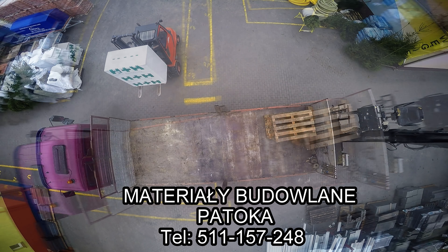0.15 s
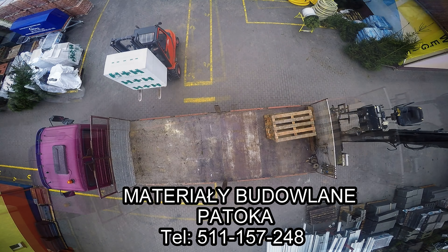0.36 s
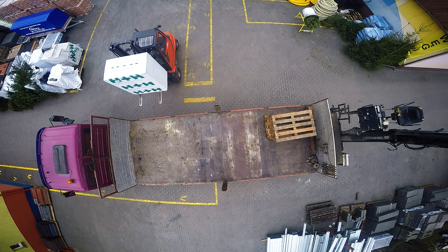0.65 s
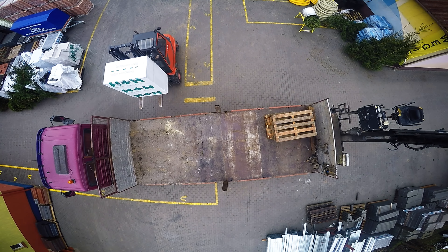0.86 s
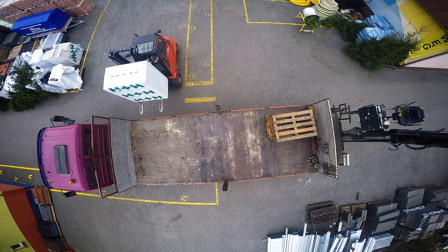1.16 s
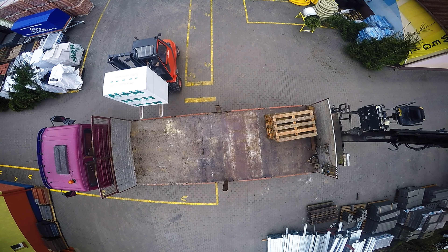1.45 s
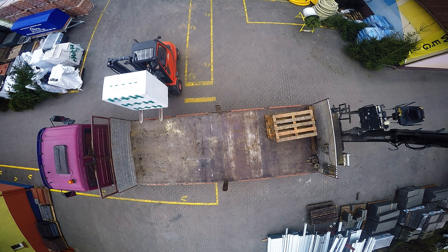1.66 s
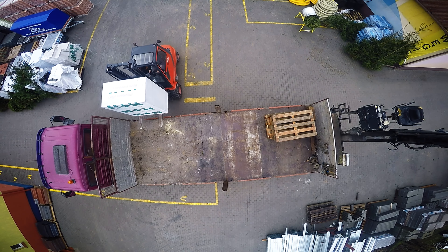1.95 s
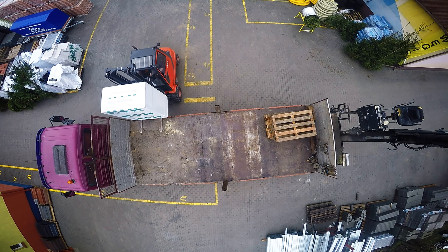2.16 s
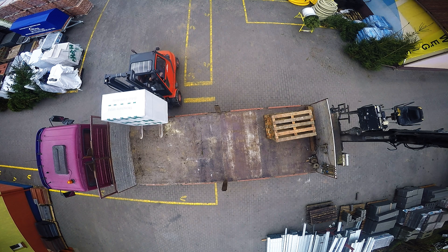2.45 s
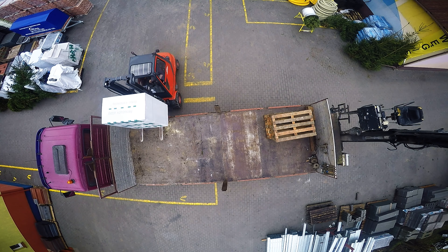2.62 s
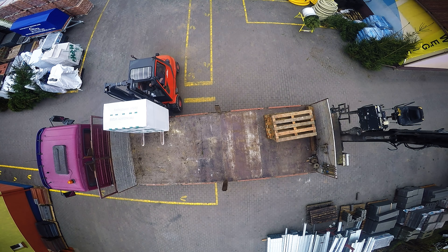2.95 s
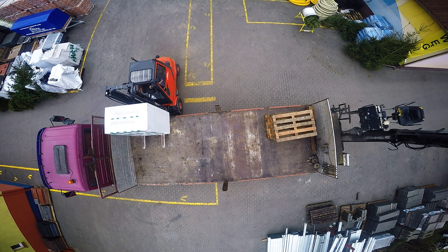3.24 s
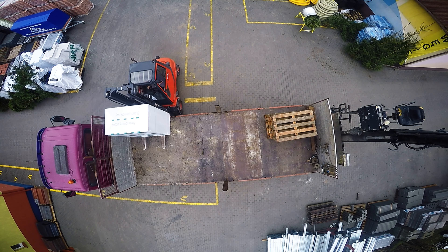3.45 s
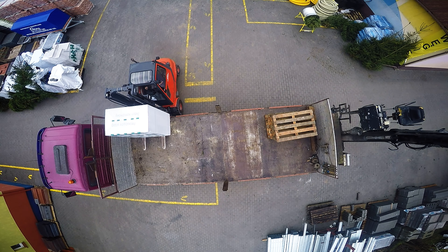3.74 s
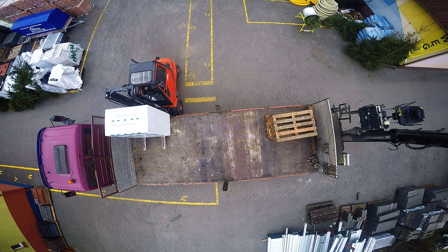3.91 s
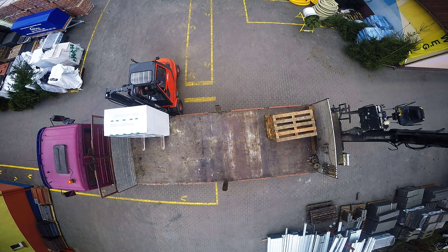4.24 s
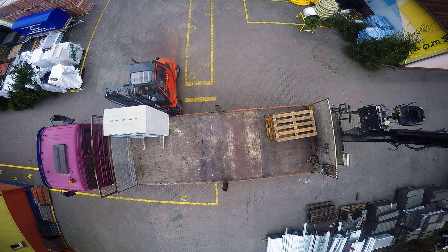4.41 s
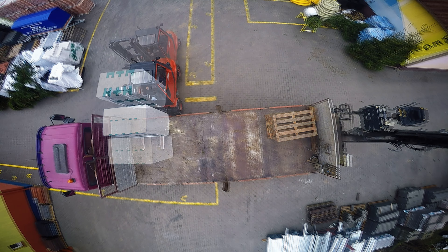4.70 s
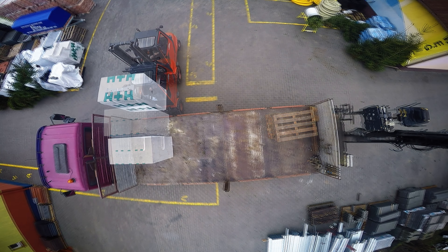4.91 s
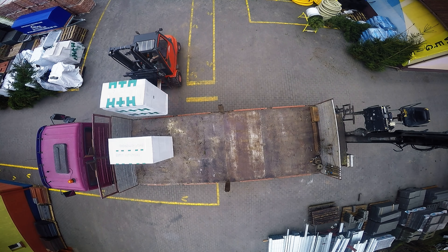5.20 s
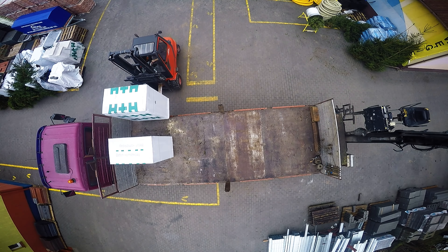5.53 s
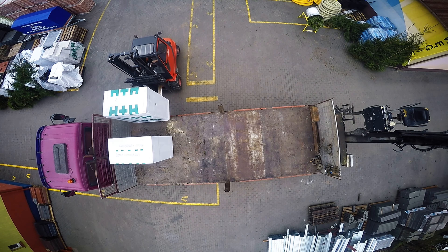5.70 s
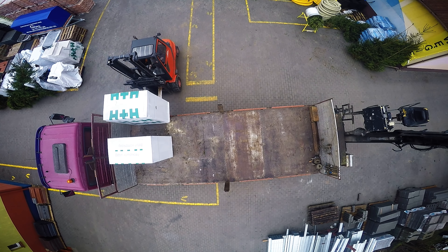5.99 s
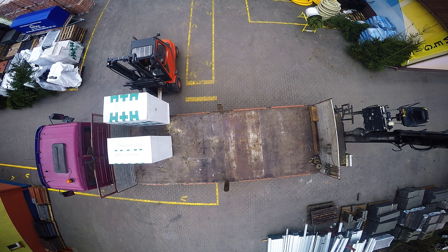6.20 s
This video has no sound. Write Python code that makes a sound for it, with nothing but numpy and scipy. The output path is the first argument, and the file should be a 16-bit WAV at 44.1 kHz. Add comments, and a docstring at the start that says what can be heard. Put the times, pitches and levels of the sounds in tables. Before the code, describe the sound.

A diesel forklift clatters and knocks steadily in an open yard, sags as its load clunks and groans onto a lorry bed, then revs up again.

```python
"""Lorry yard, heard from a camera high above: a three-cylinder diesel forklift sets a pallet of blocks on a lorry bed.
The exhaust is summed sines on the firing rate; firing jolts ring noise-fed block and hydraulic pipe resonances.
Some firings knock hard and loose panels rattle once per engine cycle.
The load drags and clunks down, small metal parts tick as short noise bursts.
The camera mount shudders at a low note, mostly early on, and rumbles in gusts, over yard air, hiss and a thin whine."""
import sys
import numpy as np
from scipy import signal
from scipy.fft import rfft, irfft
from scipy.io import wavfile
from scipy.ndimage import uniform_filter1d

SR = 44100
rng = np.random.default_rng(int(sys.argv[2]) if len(sys.argv) > 2 else 0)


def dump(signal):
    """Clip the signal to [-1, 1] and save it as 16-bit WAV at the path in sys.argv[1]."""
    limited = np.clip(np.atleast_2d(signal).T, -1, 1)
    pcm = np.round(limited * 32767).astype(np.int16)
    wavfile.write(sys.argv[1], SR, pcm)


N = 280476
TIME = np.arange(N) / SR

# engine speed: [t/s, firing rate/Hz]
SPEED_CURVE = [(0.0, 35.7), (0.44, 37.2), (0.73, 33.3), (1.08, 35.5), (2.01, 35.2), (2.42, 36.65),
               (3.14, 36.2), (3.56, 34.7), (3.96, 33.8), (4.23, 31.7), (4.59, 31.8), (4.8, 35.4),
               (5.3, 36.4), (5.82, 36.3), (6.36, 35.3)]
# engine effort, before the clatter and pump trims: [t/s, level/dB]
EFFORT_CURVE = [(0, -47), (0.25, -48.5), (0.48, -46), (0.67, -50.5), (0.77, -44), (1.0, -46.5), (2.2, -46),
                (2.7, -45), (3.5, -47), (3.9, -48), (4.3, -46.5), (4.65, -50.5), (5.15, -47), (5.6, -47.5),
                (5.95, -46)]
# hydraulic load, re effort and before the pump trim: [t/s, level/dB]
PRESSURE_CURVE = [(0, -9.5), (2.2, -8.5), (3.1, -5.5), (4.3, -5), (4.7, -4.5), (5.05, -15)]
# engine block resonances: [f/Hz, width/Hz, relative level/dB]
BLOCK_MODES = [(398, 260, -19.5), (614, 137, -13), (1209, 100, -16.5), (1478, 190, -9.5), (1779, 217, -3),
               (1994, 326, -6), (2425, 165, 3.5), (2598, 345, -3.5), (3072, 414, -5), (3830, 350, -12),
               (4940, 790, -23), (6420, 690, -30.5)]
# hydraulic pump and pipe resonances: [f/Hz, width/Hz, relative level/dB]
PIPE_MODES = [(1071.4, 87, 5), (1200, 93, 2.5)]


def forklift(clatter_trim_db=-1.5, pump_trim_db=-3.5, pump_throb=0.72):
    """Exhaust, block clatter, knocks, pump and panels all follow the crank."""
    rate_hz, = in_time(SPEED_CURVE)
    firings = np.cumsum(rate_hz) / SR   # running count
    effort_db, = in_time(EFFORT_CURVE)
    pressure_db, = in_time(PRESSURE_CURVE)
    force = firing_force(firings)

    clatter = rattle(force, BLOCK_MODES, lambda: valve_train(firings))
    clatter = from_db(effort_db + clatter_trim_db) * clatter
    pump_force = rms_one(1 + pump_throb * (force - 1))
    pump = from_db(effort_db + pressure_db + pump_trim_db) * rattle(pump_force, PIPE_MODES)
    return exhaust(firings, rate_hz) + clatter + knocks(firings) + pump + panels(firings)


# boom, re the boom level: [multiple of firing rate, level/dB]
BOOM_ORDERS = [(1, -7), (2, 2.5), (3, -12.5)]
# burr, re the burr curve: [multiple of firing rate, level/dB]
BURR_ORDERS = [(4, 1.5), (5, -17), (6, -22.5)]
# burr strength: [t/s, level/dB]
BURR_CURVE = [(0.2, -66), (0.85, -54.5), (1.15, -57.5), (2.4, -61), (4.1, -60), (4.45, -66), (5.1, -56.5),
              (5.7, -58), (6.05, -55)]
# the boom weakens as the engine is dragged below working speed
WORKING_HZ, BOOM_DB, BOOM_DB_PER_HZ = 36, -51.5, 2.5


def exhaust(firings, rate_hz):
    """One puff per firing: phase-locked low multiples of the firing rate."""
    excess_hz = np.minimum(rate_hz - WORKING_HZ, 0.4)
    boom_db = BOOM_DB + BOOM_DB_PER_HZ * excess_hz
    burr_db, = in_time(BURR_CURVE)
    out = 0
    for group_db, orders in ((boom_db, BOOM_ORDERS), (burr_db, BURR_ORDERS)):
        for order, db in orders:
            tone = np.sqrt(2) * np.sin(2 * np.pi * order * firings)
            out = out + from_db(group_db + db) * tone
    return out


def firing_force(firings, fall_firings=0.53, steady=1.0, uneven_db=2.0, ignition_firings=0.22):
    """Each firing is a jolt of uneven size, decaying over steady gear noise."""
    turn = firings + 3 - ignition_firings   # +3 keeps the count positive
    number = turn.astype(int)
    sizes = from_db(uneven_db * rng.standard_normal(number[-1] + 1))
    jolts = sizes[number] * np.exp(-(turn % 1) / fall_firings)
    return rms_one(steady + jolts)


def valve_train(firings, repeat=0.67):
    """Fine contact noise, part of which repeats every engine cycle (3 firings)."""
    cycle = (firings // 3).astype(int)
    samples_since_start = np.arange(N) - np.searchsorted(cycle, cycle)
    repeated = rng.standard_normal(N)[samples_since_start]
    return rms_one(repeat * repeated + rng.standard_normal(N))


# knocking spells: [start t/s, end t/s, cylinder 0-2, kick level/dB before scatter]
KNOCK_SPELLS = [(0.33, 0.49, 1, -33.5), (0.76, 1.08, 1, -33), (1.1, 2.28, 1, -37.5), (2.45, 3.7, 1, -36),
                (5.55, 6.3, 1, -36), (1.46, 2.55, 2, -44), (2.56, 3.2, 2, -37), (3.22, 3.99, 2, -32),
                (4.08, 4.36, 2, -33), (4.46, 4.73, 2, -36.5), (5.08, 5.72, 2, -40), (5.74, 6.3, 2, -37.5)]
KNOCK_PLACE_FIRINGS = 0.29   # delay after the firing count ticks over
KNOCK_SCATTER_DB, SLAP_DB, SLAP_SCATTER_DB = 1.6, -3, 0.5


def hard_firings(firings):
    """A knocking cylinder strikes at one crank angle each cycle: rows (t/s, kick/dB, slap re kick/dB)."""
    number = np.arange(int(firings[-1]))
    times_s = np.interp(number + KNOCK_PLACE_FIRINGS, firings, TIME)
    luck = rng.standard_normal((len(number), 2))
    rows = []
    for start_s, end_s, cylinder, db in KNOCK_SPELLS:
        for n in number[round(cylinder)::3]:
            if start_s <= times_s[n] < end_s:
                kick_db = db + KNOCK_SCATTER_DB * luck[n, 0]
                slap_db = SLAP_DB + SLAP_SCATTER_DB * luck[n, 1]
                rows.append((times_s[n], kick_db, slap_db))
    return rows


# covers rattled by a knock: [f/Hz, width/Hz, relative level/dB]
COVER_MODES = [(1227, 100, 5), (1930, 710, -2.5), (2467, 280, 8.5), (2980, 840, -21), (3850, 400, -4)]


def knocks(firings, ring_hz=2440, rattle_db=-13.0, decay_s=0.011, slap_s=0.0074):
    """A hard firing rings the block's main mode, slaps it once more and rattles the covers."""
    kicks, hard = np.zeros(N), hard_firings(firings)
    for s, db, slap_db in hard:
        kicks[int(s * SR)] = from_db(db)
        kicks[int((s + slap_s) * SR)] += from_db(db + min(slap_db, 0))
    ring = band(kicks, ring_hz - 65, ring_hz + 65)
    ring *= 0.55 * kicks.max() / np.abs(ring).max()
    shaking = signal.lfilter(np.ones(130) / 130, [1], blows(hard, decay_s))   # onset softened over 3 ms
    return ring + from_db(rattle_db) * rattle(shaking, COVER_MODES)


# loose parts: [start t/s, end t/s, place/firings, length/firings, f/Hz, width/Hz, full-swell rms level/dB]
LOOSE_PANELS = [(0.067, 3.8, 0.26, 0.39, 472, 40, -70.5), (5, 7.7, 0.18, 0.43, 446, 42, -69),
                (3.13, 4.43, 2.48, 0.25, 1216, 110, -63), (4.92, 6.25, 2.5, 1, 610, 78, -65)]
# mast resonances: [f/Hz, width/Hz, full-swell rms level/dB]
MAST_MODES = [(1260, 100, -68), (1572, 41, -63.5), (1810, 250, -67), (1920, 56, -58)]
MAST_FROM_S, MAST_PLACE_FIRINGS, MAST_LENGTH_FIRINGS = 5.07, 2.35, 0.23


def panels(firings, fade_s=0.39, loose=0.31):
    """Loose panels and mast rattle in one burst per engine cycle, much the same each time."""
    mast = [(MAST_FROM_S, np.inf, MAST_PLACE_FIRINGS, MAST_LENGTH_FIRINGS, *mode) for mode in MAST_MODES]
    out = 0
    for start_s, end_s, place, length, hz, width_hz, db in list(LOOSE_PANELS) + mast:
        swell = np.clip(np.minimum(TIME - start_s, end_s - TIME) / fade_s, 0, 1)
        offset = (firings - place + 1.5) % 3 - 1.5   # firings from burst centre
        burst = rms_one(np.exp(-(offset / length) ** 2))
        mode = [(hz, width_hz, 0)]
        same = rms_one(rattle(burst, mode, lambda: valve_train(firings, repeat=17)))
        varied = loose * rattle(burst, mode)
        out = out + from_db(db) * swell * rms_one(same + varied)
    return out


# load settling on the bed: [t/s, force level/dB]
LOAD_CLUNKS = [(4.08, -58), (4.152, -49), (4.247, -58), (4.29, -59), (4.655, -56)]
# pallet and bed resonances: [f/Hz, width/Hz, relative level/dB]
BED_MODES = [(367, 62, -0.5), (580, 150, 1.5), (810, 150, -1), (1500, 900, -28)]
# pallet drags as it settles and as the forks let go: [t/s, peak force level/dB, half-width/s]
PALLET_DRAGS = [(4.15, -60, 0.26), (4.72, -59, 0.2)]
# deep bed notes brought out by a drag: [f/Hz, width/Hz, relative level/dB]
GROAN_MODES = [(104, 22, 1), (195, 49, -12), (376, 77, -10.5)]


def load(decay_s=0.033):
    """Decaying blows clunk the pallet on the bed; smooth drags make the bed groan."""
    clunk = rattle(blows(LOAD_CLUNKS, decay_s), BED_MODES)
    groan = rattle(swells(PALLET_DRAGS), GROAN_MODES)
    return clunk + groan


# sharp metal ticks, before the tick trim: [t/s, peak level/dB, lowest f/Hz, highest f/Hz]
SHARP_TICKS = [(0.101, -53, 6500, 11500), (4.167, -53, 5200, 8000), (4.349, -48.5, 3780, 7400),
               (4.466, -57, 4000, 9000), (5.104, -48, 7000, 13900), (5.858, -51, 4500, 9000),
               (6.289, -49, 7000, 14000), (6.307, -44, 5960, 12600)]
# faint ticks at random times, same trim
FAINT_FROM_S, FAINT_TO_S = 4.6, 6.3
FAINT_TICK_DB, FAINT_LOW_HZ, FAINT_HIGH_HZ = -56, 6200, 11400


def ticks(decay_s=0.001, trim_db=2.5, faint_count=4):
    """Metal on metal: very short, bright, band-limited noise snaps."""
    out, age_s = np.zeros(N), TIME[:SR // 40]
    faint_times_s = rng.uniform(FAINT_FROM_S, FAINT_TO_S, faint_count)
    faint = [(s, FAINT_TICK_DB, FAINT_LOW_HZ, FAINT_HIGH_HZ) for s in faint_times_s]
    for s, db, low_hz, high_hz in list(SHARP_TICKS) + faint:
        noise = rng.standard_normal(len(age_s)) * np.exp(-age_s / decay_s)
        snap = band(noise, low_hz, high_hz)
        snap = from_db(db + trim_db) * snap / np.abs(snap).max()
        at = int(s * SR)
        out[at:at + len(age_s)] += snap[:N - at]
    return out


# gusts on the camera mount, before the rumble trim: [t/s, peak of rms level/dB, half-width/s]
MOUNT_GUSTS = [(0.06, -42, 0.15), (0.49, -47.5, 0.031), (2.27, -51.5, 0.05), (4.3, -48.5, .09),
               (4.72, -47.5, 0.21), (5.22, -50, 0.21), (5.85, -43.5, 0.12), (6.15, -41.5, 0.12),
               (6.34, -46.5, 0.097)]
BREEZE_DB = -58.5   # rumble between gusts, same trim
# shudders of the mount: jolts, and one swell driven by the engine at 2.35 s:
# [t/s, peak of rms level/dB, decay/s]
MOUNT_SHUDDERS = [(0.025, -36.5, 0.14), (0.14, -45.5, .08), (0.236, -31, 0.054), (0.485, -39.5, 0.011),
                  (2.35, -54, .35)]
SHUDDER_RISE_S = 0.019
# rumble colour: [f/Hz, relative density/dB]
RUMBLE_SPECTRUM = [(15, -11), (28, -15), (36, 3), (41, 1), (47, -8), (56, -12), (75, -15.5), (110, -16),
                   (150, -35), (200, -40.5), (400, -43), (1000, -78)]
# mount creak resonances: [f/Hz, width/Hz, relative level/dB]
CREAK_MODES = [(4820, 190, 4), (7000, 390, -10), (10300, 1400, -14)]


def mount(rumble_trim_db=3.5, shudder_hz=109, wander_hz=3.0,
          creak_gain_db=-37.0, creak_scatter_db=3.8, creak_limit_db=-35.0):
    """Gusts sway the camera mount; when shaken it shudders at its own low note and creaks."""
    sway = np.hypot(from_db(BREEZE_DB), swells(MOUNT_GUSTS))
    rumble = coloured(RUMBLE_SPECTRUM)
    rumble /= np.sqrt(uniform_filter1d(rumble ** 2, size=SR // 10))   # sway alone sets its strength

    shake = 0
    for s, db, decay_s in MOUNT_SHUDDERS:
        fall = np.maximum((s - TIME) / SHUDDER_RISE_S, (TIME - s) / decay_s)
        shake = shake + from_db(db) * np.exp(-fall)
    note_hz = shudder_hz + wander_hz * drift(8.5)
    note = np.sqrt(2) * np.sin(2 * np.pi * np.cumsum(note_hz) / SR)

    creak_gain = from_db(creak_gain_db + creak_scatter_db * drift(30))
    creak = rattle(np.minimum(shake, from_db(creak_limit_db)) * creak_gain, CREAK_MODES)
    return from_db(rumble_trim_db) * sway * rumble + shake * note + creak


# yard air and hiss colour: [f/Hz, relative density/dB]
AIR_SPECTRUM = [(30, -12), (150, 10), (250, -2.5), (400, -2), (600, -6), (800, -1.5), (1400, -3.5),
                (3000, -3.5), (4500, -14.5), (5800, -21.5), (7500, -18), (8500, -20.5), (11000, -22.5),
                (15000, -25.5)]
# yard air and hiss strength: [t/s, rms level/dB]
AIR_CURVE = [(0, -57), (1, -56.5), (4.2, -57.5), (4.65, -59), (4.95, -58.5), (5.3, -57), (6.36, -55)]


def yard_air():
    """Coloured noise whose level drifts slowly."""
    air_db, = in_time(AIR_CURVE)
    return from_db(air_db) * coloured(AIR_SPECTRUM)


# camera electronics whine: [f/Hz, rms level/dB]
WHINE_TONES = [(5033, -80.5), (10045, -83), (10072, -94), (15079, -92)]


def whine(wander_hz=1.9):
    """Thin tones of steady level from the camera's electronics, wandering slightly in pitch."""
    out = 0
    for hz, db in WHINE_TONES:
        tone_hz = hz + wander_hz * drift(2.46)
        out = out + from_db(db) * np.sqrt(2) * np.sin(2 * np.pi * np.cumsum(tone_hz) / SR)
    return out


def from_db(db):
    """Decibels to gain."""
    return 10 ** (np.asarray(db) / 20)


def rms_one(x):
    """Scale to unit rms."""
    return x / np.sqrt(np.mean(x ** 2) + 1e-20)


def in_time(rows):
    """Each column of a curve, interpolated at every sample."""
    s, *columns = np.transpose(rows)
    return [np.interp(TIME, s, column) for column in columns]


def coloured(points):
    """Steady noise with the given spectrum, straight lines in dB over log f; rms 1."""
    hz, db = np.transpose(points)
    bins_hz = np.maximum(np.arange(N // 2 + 1) * SR / N, 1)
    gain = from_db(np.interp(np.log(bins_hz), np.log(hz), db))
    return rms_one(irfft(rfft(rng.standard_normal(N)) * gain, N))


def drift(rate_hz):
    """Slow random signal, mostly below rate_hz; rms 1."""
    bins_hz = np.arange(N // 2 + 1) * SR / N
    return rms_one(irfft(rfft(rng.standard_normal(N)) / (1 + (bins_hz / rate_hz) ** 4), N))


def band(x, low_hz, high_hz):
    """Causal band-pass."""
    edges_hz = [max(low_hz, 10), min(high_hz, SR / 2 - 100)]
    return signal.sosfilt(signal.butter(2, edges_hz, "band", fs=SR, output="sos"), x + 1e-18)


def rattle(force, resonances, grain=None):
    """A rough force shakes each resonance with its own noise; steady force 1 gives about rms 1."""
    grain = grain or (lambda: rng.standard_normal(N))
    out, power = 0, 0
    for hz, width_hz, db in resonances:
        out = out + from_db(db) * band(force * grain(), hz - width_hz / 2, hz + width_hz / 2)
        power += from_db(db) ** 2 * width_hz * 2 / SR
    return out / np.sqrt(power)


def blows(rows, decay_s):
    """A force that jumps at each (t/s, level/dB) row and decays exponentially."""
    hits = np.zeros(N)
    for s, db, *rest in rows:
        hits[int(s * SR)] += from_db(db)
    return signal.lfilter([1], [1, -np.exp(-1 / (decay_s * SR))], hits + 1e-18)


def swells(rows):
    """Smooth swells, rows (t/s, peak level/dB, half-width/s), added in power."""
    power = 0
    for s, db, width_s in rows:
        power = power + (from_db(db) * np.exp(-((TIME - s) / width_s) ** 2)) ** 2
    return np.sqrt(power)


def later(x, delay_s):
    """Pure delay."""
    return np.interp(TIME - delay_s, TIME, x, left=0)


def scene(side_db=-32.0, side_delay_s=0.031, side_noise_db=-92.0):
    """Central mix; a faint delayed copy and very faint noise, opposite in sign left and right, give slight width."""
    yard = forklift() + load() + ticks() + yard_air()
    delayed = from_db(side_db) * band(later(yard, side_delay_s), 160, 15000)
    side_noise = from_db(side_noise_db) * coloured(RUMBLE_SPECTRUM)
    side = delayed + side_noise
    return yard + mount() + whine() + side * np.array([[1], [-1]])


CUTOFF_HZ = 15250


def record(dry):
    """Steep elliptic low-pass: 0.1 dB ripple, 80 dB stop band."""
    return signal.sosfilt(signal.ellip(12, 0.1, 80, CUTOFF_HZ, fs=SR, output="sos"), dry)


dry = scene()
out = record(dry)
dump(out)
```